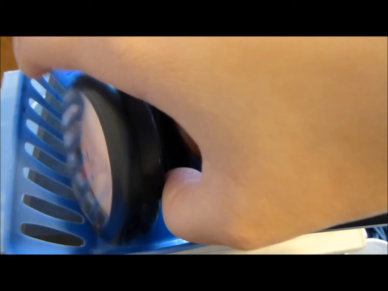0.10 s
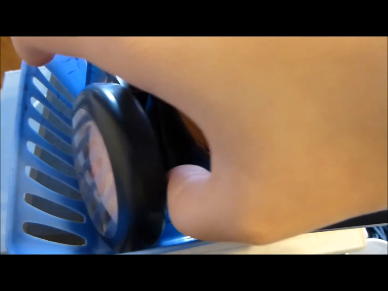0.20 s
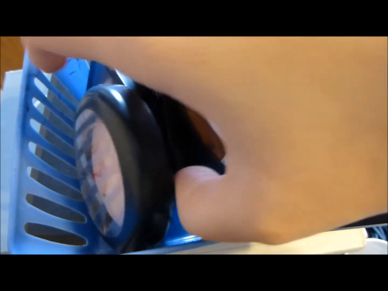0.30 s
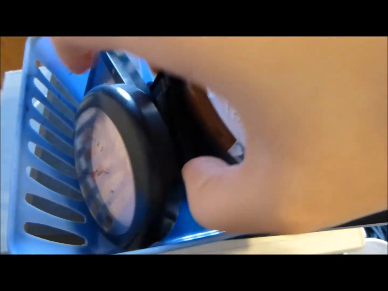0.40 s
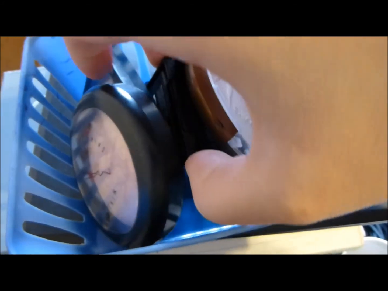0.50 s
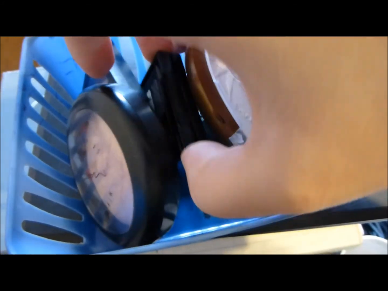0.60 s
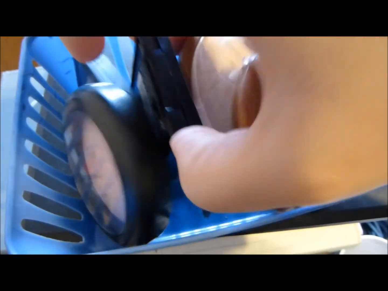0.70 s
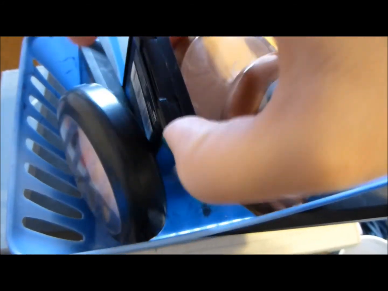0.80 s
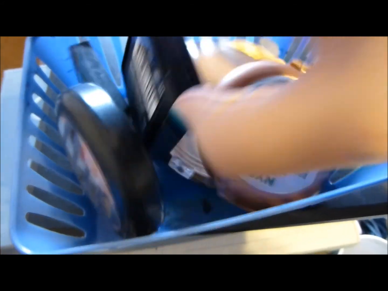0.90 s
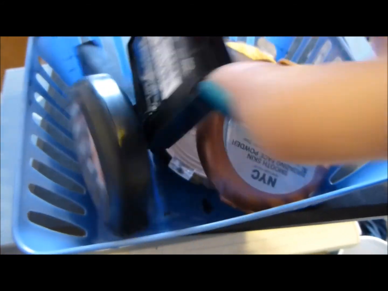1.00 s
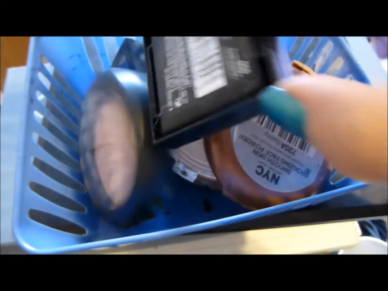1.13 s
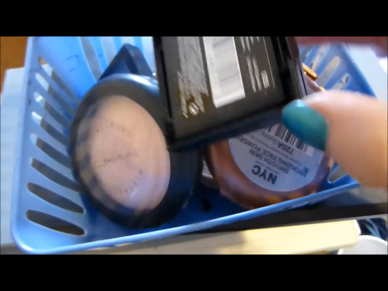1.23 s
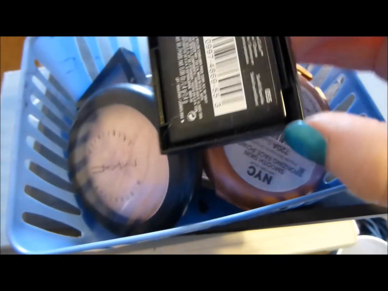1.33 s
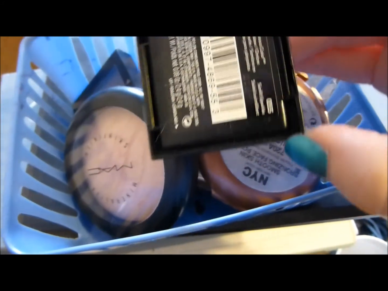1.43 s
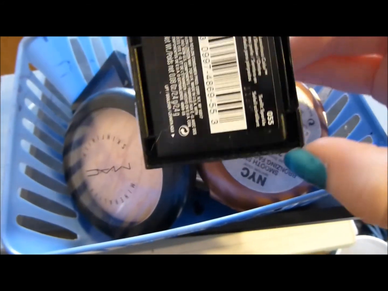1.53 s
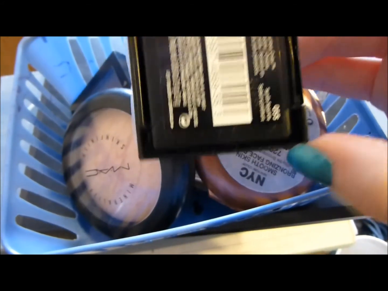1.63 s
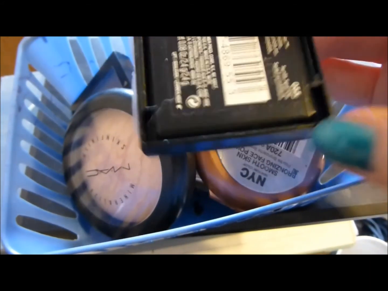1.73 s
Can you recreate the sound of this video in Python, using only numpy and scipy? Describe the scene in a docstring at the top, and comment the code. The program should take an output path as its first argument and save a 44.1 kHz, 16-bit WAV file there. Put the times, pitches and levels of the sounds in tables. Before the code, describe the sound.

Plastic compacts knock and slide in a plastic basket, close to the microphone and slightly right. A short scrape and a sharp knock come at 0.2 seconds, followed by faint ticks. Soft scraping returns around 0.7 seconds and leads into a quick clatter at 1.0. A sharp double click lands near 1.2, then lighter taps die away by 1.5 seconds. The small room adds a slight echo.

```python
"""A short scrape and a sharp plastic knock: a hand rummages through compacts in a plastic basket.
The cases hit each other and the basket; each blow snaps, clicks and rings briefly.
Between knocks they slide: uneven grains excite the same modes and finer grit hisses above them.
The stereo microphone is close by, with the basket a little to its right.
A small room answers over a faint hiss."""
import sys
import numpy as np
from scipy import signal
from scipy.fft import rfft, irfft, next_fast_len
from scipy.io import wavfile
from scipy.ndimage import uniform_filter1d, map_coordinates

SR = 44100
rng = np.random.default_rng(int(sys.argv[2]) if len(sys.argv) > 2 else 0)


def int16_out(signal):
    """Quantize to a 16-bit WAV file."""
    q = np.round(np.clip(np.atleast_2d(signal).T, -1, 1) * 32767)
    wavfile.write(sys.argv[1], SR, q.astype(np.int16))


N = 79380

# Blows, close up: t/s, level/dB, pitch f/Hz, relative click/dB, relative thud/dB,
# pan/dB (left minus right, before PAN_WEIGHT), snap t60/s, relative ring/dB
KNOCKS = [(.201, 0, 1050, -24.5, -24.5, -3.5, 0.0051, -20),
          (0.2236, -26.5, 1000, -27.5, -27, -0.5, 0.0075, -6),
          (0.259, -24.5, 950, -11.5, -16, -3, 0.0062, -14.5),
          (.265, -23.5, 1420, -50, -38, -5, 0.0037, -28), (0.3772, -30, 870, -17, -11, -3, 0.0085, -17),
          (0.3889, -27, 1560, -7.5, -29, -5, 0.0076, -7.5), (.3955, -39.5, 1240, 1.5, -28, -2, 0.0032, -30),
          (0.4051, -31, 847, -32, -32, -5, 0.015, -8.5), (.4555, -51.5, 865, -15, -6, -1, 0.013, 2.5),
          (0.5155, -43.5, 1040, -12, -25, -3, 0.013, -4.5), (0.7615, -34.5, 890, -16, -45, -10, 0.025, 0.5),
          (.778, -37, 980, -8.5, -26, 2, 0.0033, -3.5), (0.814, -39.5, 1010, -15.5, -13, -1.5, 0.0064, -25),
          (.906, -34, 1490, -6, -23, -5, 0.0073, -29.5), (0.926, -27, 1460, -17, -25, -4.5, 0.0076, -8.5),
          (.946, -36.5, 980, -4.5, -11, -4.5, 0.0071, -29),
          (0.9718, -7.5, 1147, -16.5, -38, -5.5, 0.0085, -14),
          (.9762, -15, 1493, -23, -31, -12, 0.0078, -22), (.982, -18.5, 560, -10.5, -10, -5, 0.0073, -7.5),
          (1, -34, 404.4, -11, -35, 10, 0.036, -30), (1.0105, -9, 1000, -9.5, -29.5, -5, 0.0046, -19),
          (1.056, -26, 870, -20.5, -49.5, -0.5, 0.015, -22.5),
          (1.063, -30.5, 894, -11.5, -51.5, -7, 0.024, -1),
          (1.094, -36, 892, -24.5, -39.5, -3.5, 0.068, -5), (1.146, -34, 900, -23.5, -33, -4.5, 0.02, -5.5),
          (1.17, -32, 920, -10.5, -18.5, -5.5, 0.0067, -23),
          (1.208, -44, 1850, -5.5, -25, -21.5, 0.0041, -19.5),
          (1.2244, -6.5, 1660, -21, -30, -6.5, 0.0044, -18),
          (1.2331, -2.5, 1550, -28.5, -32.5, -8, 0.0035, -22),
          (1.25, -24.5, 1710, -11.5, -13, 1, 0.0055, -30), (1.308, -43.5, 1110, -3, -4, -5.5, 0.0095, 8.5),
          (1.3198, -19, 965, -14.5, -23.5, -7.5, 0.0098, -19.5),
          (1.346, -24, 1060, -21, -27, -4, 0.005, -16), (1.73, -65.5, 590, -13, -1, -20, .012, -13.5)]
# Ringing modes of cases and basket: f/Hz, level/dB, t60/s
PLASTIC_MODES = [(527, -4.5, 0.057), (649, -9, 0.034), (870, -6.5, 0.059), (963.6, -5, 0.046),
                 (1040, -2, 0.025), (1198, 2.5, 0.017), (1330, 3, 0.02), (1460, -4.5, 0.028),
                 (1622, -11, 0.024), (1670, -4, 0.014), (1850, -14.5, 0.05), (2360, -12, 0.0065)]
# Low modes of the basket: f/Hz, level/dB, t60/s
BASKET_MODES = [(202, -7.5, 0.091), (270, 5, 0.026), (303, 4.5, 0.031), (421.6, 2, 0.056)]
# How strongly each band takes a blow's pan at the microphone: f/Hz, factor
PAN_WEIGHT = [(300, 0.032), (700, 0.24), (1300, 1.9), (4000, 0.6), (9000, 1.2), (14000, .8)]

def knocks():
    """Each blow snaps, rings the modes near its pitch, thuds the basket and clicks in the treble."""
    focus_db_per_octave, scatter_db, snap_db = 4.5, 2.5, 8
    chatter_db, chatter_t60 = -18, 0.048
    rise_s, lag_s = 0.00084, 0.00038  # the body answers just after the click
    out = np.zeros((2, N + SR))
    t = np.arange(SR // 5) / SR
    rise = (1 - np.exp(-t / rise_s)) ** 2
    lag = np.exp(-2j * np.pi * lag_s * np.fft.rfftfreq(len(t), 1 / SR))
    for start, level_db, pitch, click_db, thud_db, pan_db, snap_t60, ring_db in KNOCKS:
        octaves_away = np.abs(np.log2(np.array(PLASTIC_MODES)[:, 0] / pitch))
        scatter = scatter_db * rng.standard_normal(len(PLASTIC_MODES) + len(BASKET_MODES))
        case_scatter, basket_scatter = np.split(scatter, [len(PLASTIC_MODES)])
        ringing = ring(PLASTIC_MODES, ring_db - focus_db_per_octave * octaves_away + case_scatter, t)
        # the contact rattles on and keeps driving the modes
        rattle = (t == 0) + amp(chatter_db - 60 * t / chatter_t60) * rng.standard_normal(len(t))
        ringing = signal.fftconvolve(rise * ringing, rattle)[:len(t)]
        snap = amp(snap_db - 60 * t / snap_t60) * np.sin(2 * np.pi * pitch * t)
        thud = ring(BASKET_MODES, thud_db + basket_scatter, t)
        body = irfft(lag * rfft(ringing + rise * (snap + thud)), len(t))
        blow = amp(level_db) * (body + click(click_db, t))
        onset = round(start * SR)
        out[:, onset:onset + len(t)] += filtered(blow, lambda f: sides(pan_db * along(PAN_WEIGHT, f)))
    return out[:, :N]

def ring(modes, gains_db, t):
    """Struck plastic rings as decaying sines, one per mode."""
    hz, db, t60 = np.transpose(modes)[:, :, None]
    hz = hz * (1 + 0.01 * rng.standard_normal(hz.shape))  # each case sits differently
    return (amp(db + gains_db[:, None] - 60 * t / t60) * np.sin(2 * np.pi * hz * t)).sum(axis=0)

# Spectrum of a contact click: f/Hz, level/dB
CLICK_SPECTRUM = [(1060, 0), (1800, -7.5), (2800, -3.5), (4490, -8), (8280, -11), (11000, -18.5),
                  (13300, -17), (16000, -39.5)]
# Part of a click that differs between the microphone's two sides: f/Hz, relative amplitude
CLICK_WIDTH = [(1500, .15), (5000, 0.3), (10000, 0.8)]

def click(level_db, t):
    """Hard contact gives a crack of noise, then a fizz of tiny ticks."""
    rise_s, crack_t60, boost_db = 0.00019, 0.0045, 5.5
    fizz_db, fizz_t60, lump_db = -16, 0.11, 4
    shared, side = rng.standard_normal((2, len(t)))
    side = filtered(side, lambda f: along(CLICK_WIDTH, f))
    noise = coloured(np.array([shared + side, shared - side]), CLICK_SPECTRUM)
    lumps = lump_db * unit(uniform_filter1d(rng.standard_normal(len(t)), size=90))
    fizz = amp(fizz_db - 60 * t / fizz_t60 + lumps)
    crack = amp(-60 * t / crack_t60)
    crack *= np.linalg.norm(crack) / np.linalg.norm(crack * noise.mean(axis=0))  # keeps its strength
    rise = 1 - np.exp(-t / rise_s)
    return amp(level_db + boost_db) * rise * noise * (crack + fizz)

# Course of the sliding in the basket: t/s, rubbing level/dB, grit level/dB
SLIDES = [(0, -71.5, -71.5), (0.139, -62.5, -65), (.19, -49, -51), (.28, -47.5, -58.5), (0.329, -86, -72),
          (0.372, -57.5, -60.5), (0.428, -63.5, -64), (0.551, -68.5, -75), (.59, -79, -76),
          (0.688, -71.5, -68.5), (0.716, -51, -59.5), (0.75, -50, -58), (.81, -59, -59), (0.891, -70, -69),
          (0.914, -47.5, -55), (0.951, -46.5, -48), (1.04, -46.5, -53.5), (1.091, -51, -64),
          (1.181, -52, -61), (1.193, -48, -46.5), (1.226, -56.5, -46), (1.29, -68.5, -64.5),
          (1.368, -56, -59.5), (1.441, -83.5, -71.5), (1.48, -107, -101)]
# Tone colour laid over the rubbed modes: f/Hz, level/dB
RUB_SPECTRUM = [(88, -54), (150, -15.5), (516, -13), (602, -14), (975, -0.5), (1280, -19.5), (1400, -10.5),
                (2500, -12.5), (3250, -54), (5500, -120)]
# Balance of the sliding at the microphone: f/Hz, left minus right/dB
RUB_PAN = [(200, 1), (1300, -7.5), (5000, -2.5), (15000, -2.5)]

def sliding():
    """Surfaces rub: uneven grains excite the modes, finer grit hisses above them."""
    grains_per_s, spread_db, mode_width_hz = 2200, 9, 100
    times, rub_db, grit_db = np.transpose(SLIDES)
    t = np.arange(N) / SR
    grains = (rng.random(N) < grains_per_s / SR) * amp(spread_db * rng.random(N))
    grains *= np.sign(rng.standard_normal(N))
    modes = [(hz, mode_width_hz, db) for hz, db, _ in BASKET_MODES + PLASTIC_MODES]
    ringing = filtered(grains, lambda f: resonances(modes, f))
    rub = coloured(ringing, RUB_SPECTRUM) * amp(np.interp(t, times, rub_db))
    hiss = grit(grains, t) * amp(np.interp(t, times, grit_db))
    return filtered(rub + hiss, lambda f: sides(along(RUB_PAN, f)))

# Broad resonances of the grit: f/Hz, width/Hz, level/dB
GRIT_PEAKS = [(2480, 900, 3), (4960, 1100, 5.5), (6790, 4500, -1.5), (9140, 1100, -0.5),
              (13100, 1100, -6.5)]

def grit(grains, t):
    """Fine grit hisses in step with the grains; each resonance swells and fades on its own."""
    grain_depth, stereo_width, wander_db, wander_per_s = 0.7, 0.6, 4, 40
    roughness = 1 + grain_depth * unit(uniform_filter1d(grains ** 4, size=60))
    noise = rng.standard_normal((3, N)) * roughness
    stereo = noise[0] + stereo_width * noise[1:]
    hiss = np.zeros((2, N))
    for peak in GRIT_PEAKS:
        drift = map_coordinates(rng.standard_normal(N // 100), [wander_per_s * t])  # smooth random curve
        hiss += amp(wander_db * drift) * filtered(stereo, lambda f: resonances([peak], f))
    return unit(hiss)

# Decay of the small room around the basket: f/Hz, t60/s
ROOM_DECAY = [(200, 0.22), (2000, 0.34), (12000, 0.16)]

def room(x):
    """Each frequency of the room's answer dies at its own speed."""
    hz, t, spectrum = signal.stft(rng.standard_normal((2, SR // 2)), SR, nperseg=256)
    decay = amp(-60 * t / along(ROOM_DECAY, hz)[:, None])
    tail = signal.istft(spectrum * decay, SR, nperseg=256)[1]
    delayed = np.pad(x.mean(axis=0), (200, 0))[None]
    return signal.fftconvolve(delayed, tail / np.linalg.norm(tail[0]), axes=1)[:, :N]

# Room tone at the microphone: f/Hz, level/dB
AIR_SPECTRUM = [(20, -2.5), (60, -11), (120, -8.5), (250, -3.5), (450, -9.5), (1000, -13), (2500, -20),
                (5000, -21), (9000, -22.5), (14500, -29), (16000, -42.5)]
# Likeness of the room tone left and right: f/Hz, correlation
AIR_LIKENESS = [(60, 0.25), (240, 0.48), (950, 0.49), (3770, 0.033), (15000, -0.35)]

def air():
    """Steady hiss and hum of room and microphone."""
    def mid_side_gains(hz):
        angle = np.arccos(along(AIR_LIKENESS, hz)) / 2
        return amp(along(AIR_SPECTRUM, hz)) * [np.cos(angle), np.sin(angle)]
    mid, side = filtered(rng.standard_normal((2, N)), mid_side_gains)
    return np.array([mid + side, mid - side]) / np.std(mid)

def amp(db):
    """Decibels to amplitude."""
    return 10 ** (np.asarray(db) / 20)

def unit(x):
    """x scaled to rms 1."""
    return x / np.sqrt(np.mean(x ** 2) + 1e-20)

def along(points, hz):
    """Interpolates (f/Hz, value) points on a log frequency axis."""
    f, values = np.transpose(points)
    return np.interp(np.log(hz + 1), np.log(f + 1), values)

def filtered(x, response):
    """x through a frequency response."""
    n = x.shape[-1]
    padded = next_fast_len(n + 4096)
    return irfft(rfft(x, padded) * response(np.fft.rfftfreq(padded, 1 / SR)), padded)[..., :n]

def coloured(x, spectrum):
    """x shaped by (f/Hz, level/dB) points, at rms 1."""
    return unit(filtered(x, lambda hz: amp(along(spectrum, hz))))

def sides(db):
    """Left and right gains for a left-minus-right difference."""
    return amp(np.array([db / 2, -db / 2]))

def resonances(peaks, f):
    """Causal response of (f/Hz, width/Hz, level/dB) resonances, alternating in sign."""
    return sum((-1) ** k * amp(db) * 1j * f * width / (centre ** 2 - f ** 2 + 1j * f * width)
               for k, (centre, width, db) in enumerate(peaks))

def scene():
    """Knocks and sliding close to the microphone; behind them the room's answer and its hiss."""
    low_cut_hz = 130  # small objects radiate no deep bass
    room_db, air_db = -16.5, -71
    hits = filtered(knocks(), lambda f: (1j * f / (low_cut_hz + 1j * f)) ** 3)
    return hits + sliding() + amp(room_db) * room(hits) + amp(air_db) * air()

def record(dry):
    """The microphone fades in the top treble; nothing passes above the band limit."""
    fade_hz, limit_hz = 15300, 16400
    return filtered(dry, lambda hz: (hz < limit_hz) / (1 + (hz / fade_hz) ** 20))

dry = scene()
out = record(dry)
int16_out(out)
```